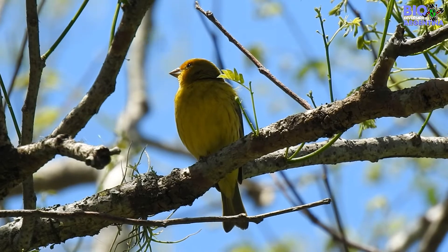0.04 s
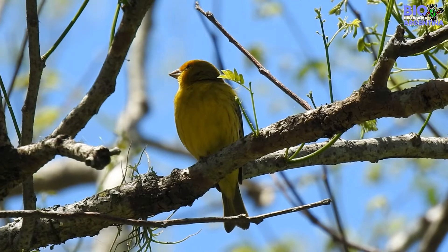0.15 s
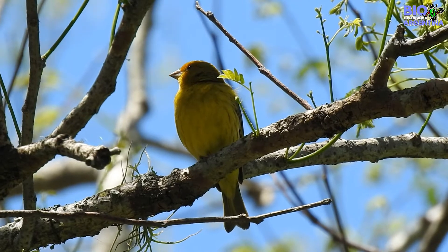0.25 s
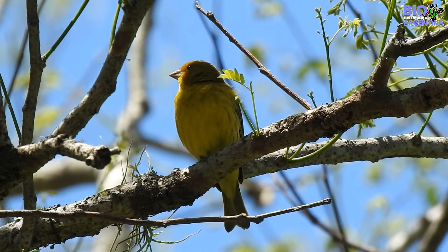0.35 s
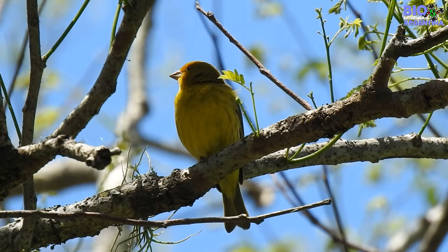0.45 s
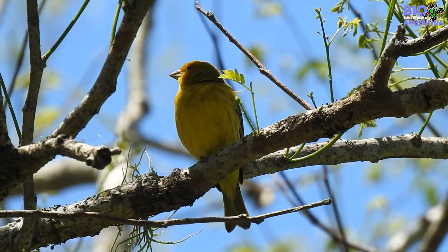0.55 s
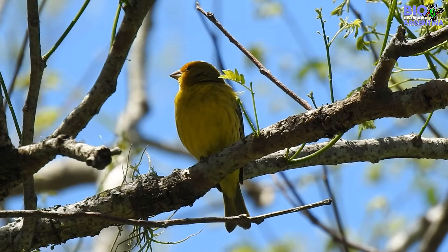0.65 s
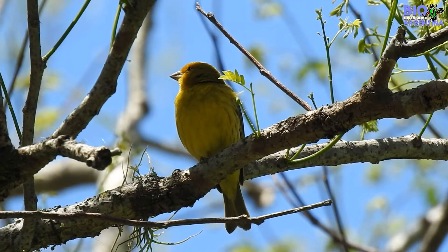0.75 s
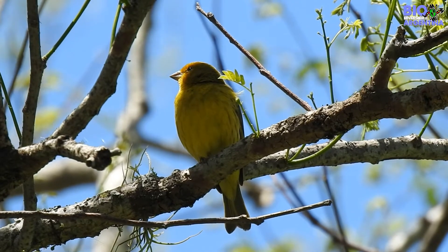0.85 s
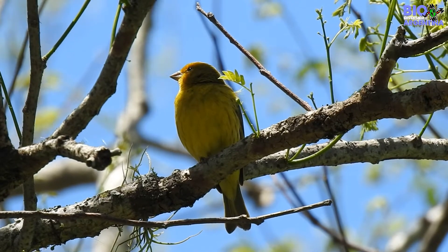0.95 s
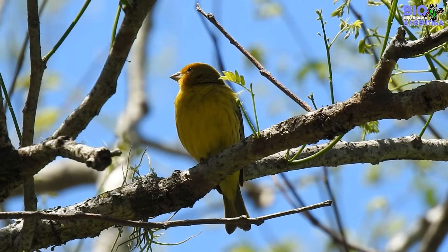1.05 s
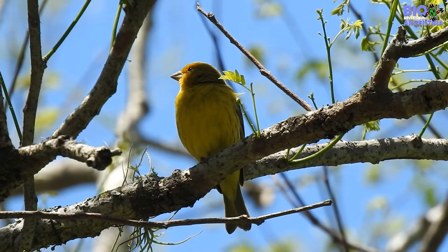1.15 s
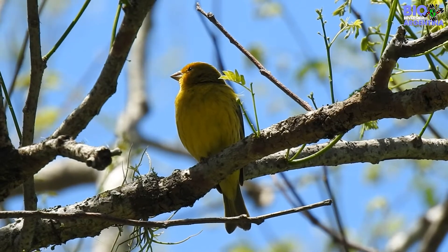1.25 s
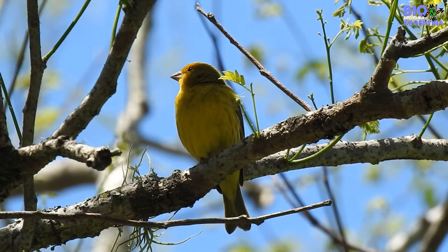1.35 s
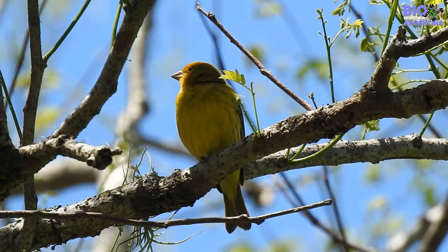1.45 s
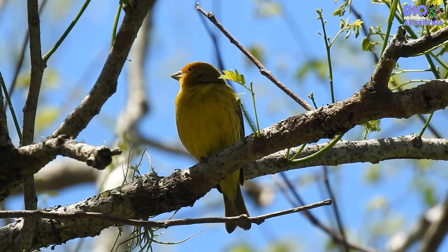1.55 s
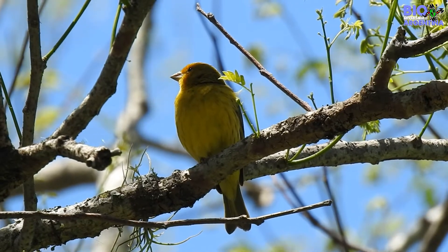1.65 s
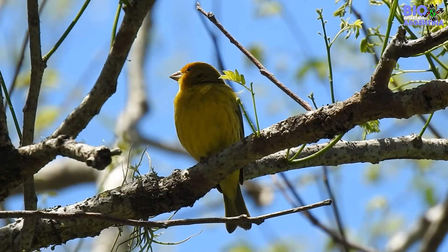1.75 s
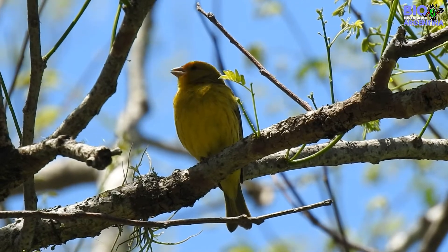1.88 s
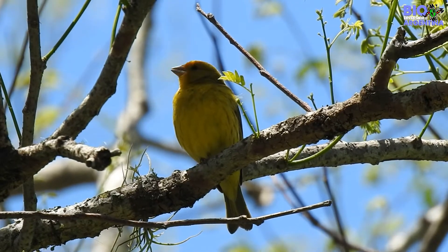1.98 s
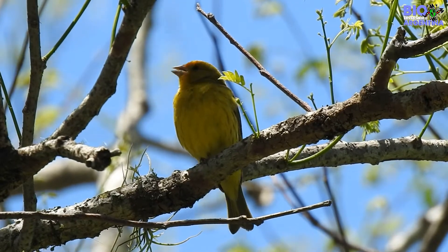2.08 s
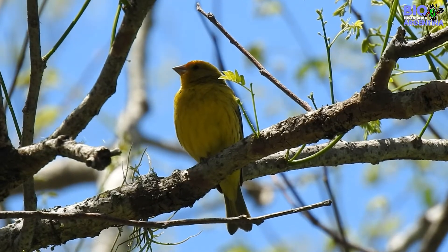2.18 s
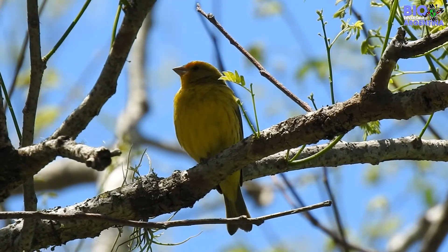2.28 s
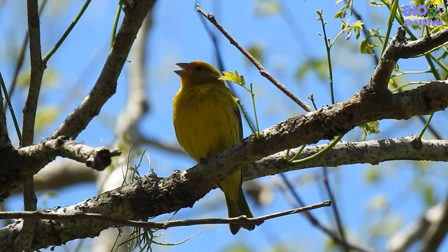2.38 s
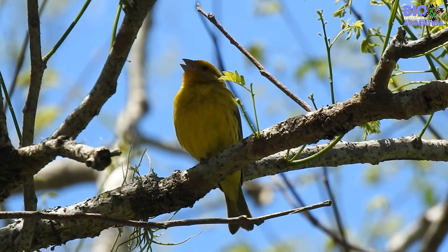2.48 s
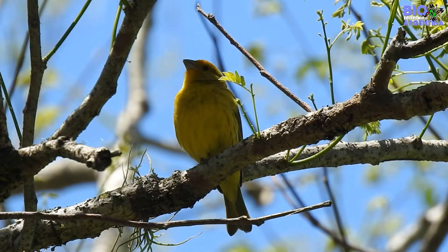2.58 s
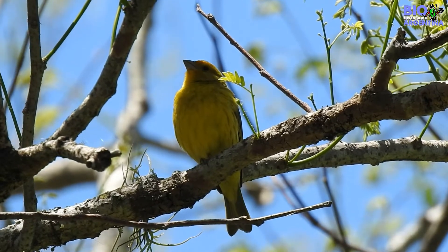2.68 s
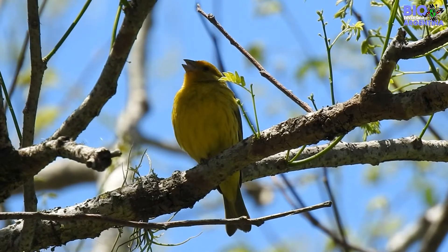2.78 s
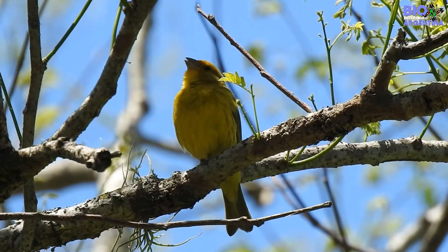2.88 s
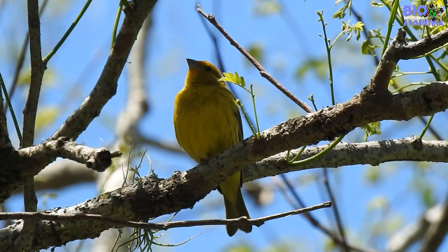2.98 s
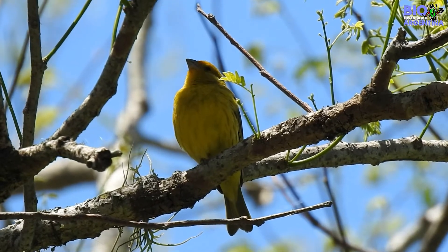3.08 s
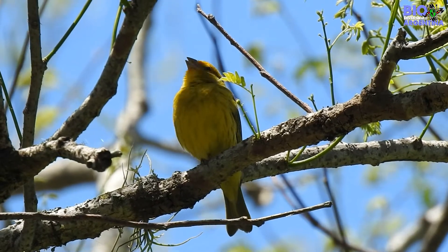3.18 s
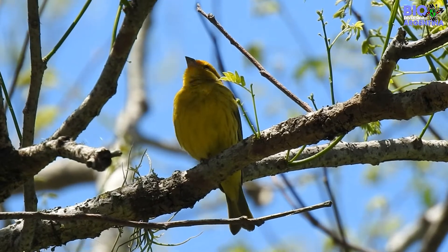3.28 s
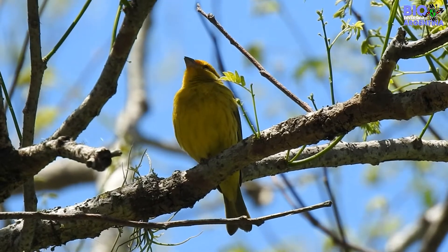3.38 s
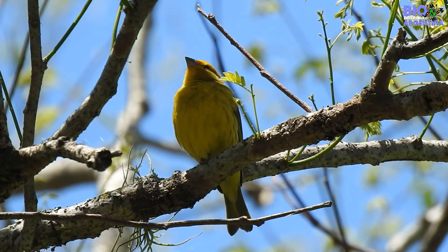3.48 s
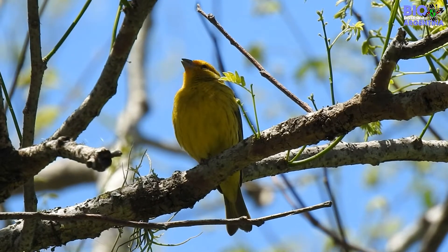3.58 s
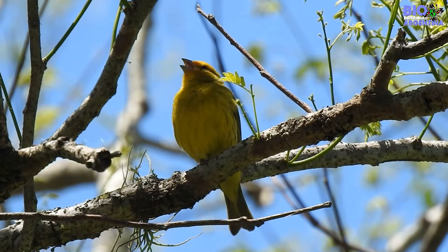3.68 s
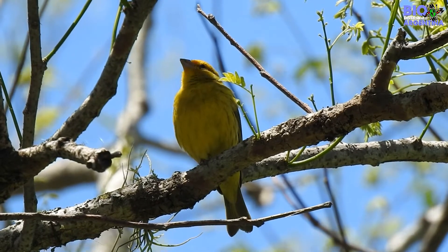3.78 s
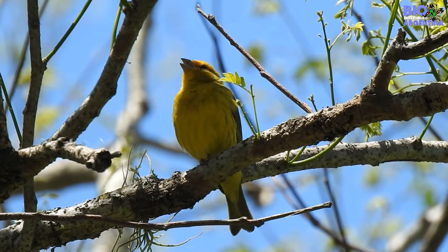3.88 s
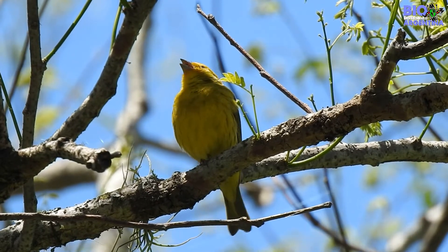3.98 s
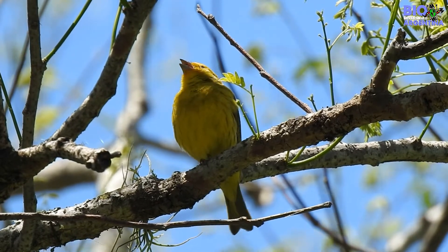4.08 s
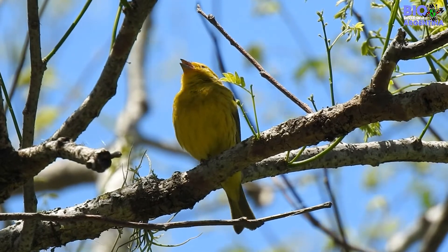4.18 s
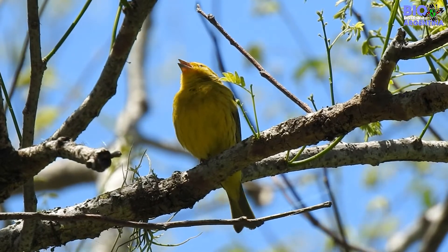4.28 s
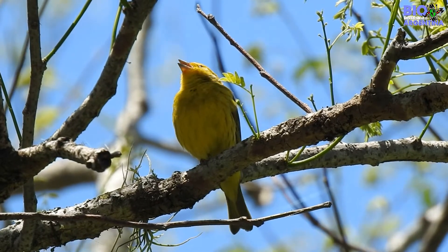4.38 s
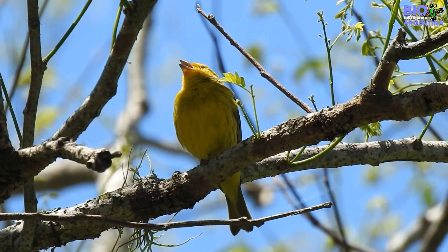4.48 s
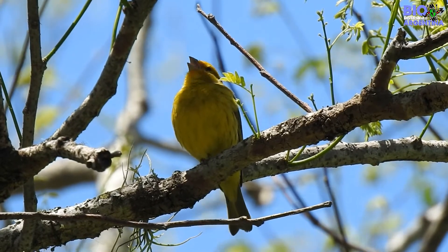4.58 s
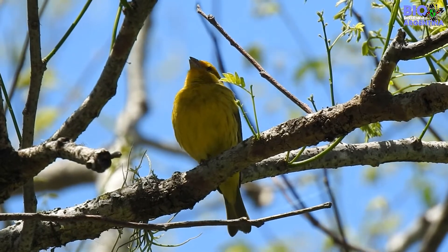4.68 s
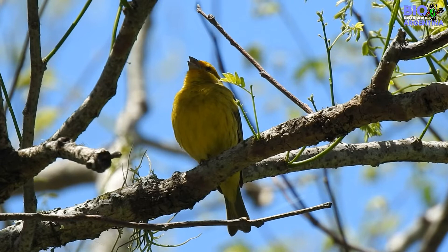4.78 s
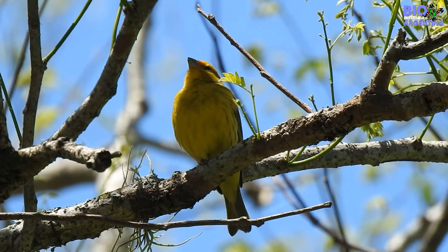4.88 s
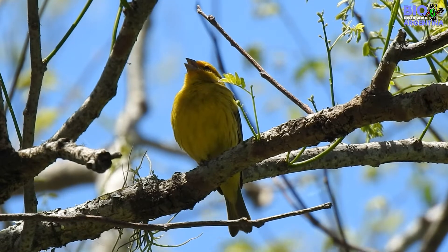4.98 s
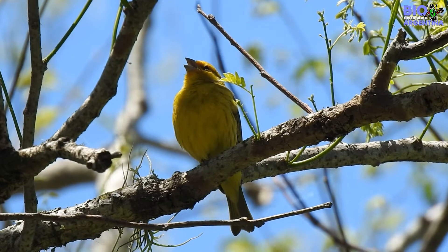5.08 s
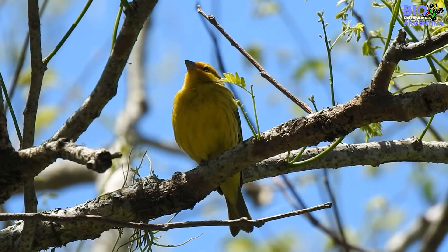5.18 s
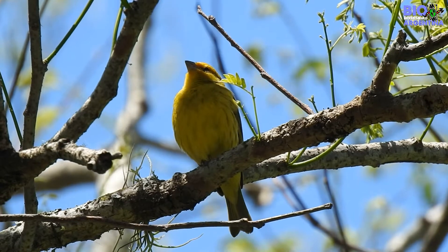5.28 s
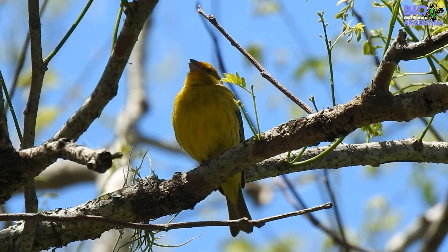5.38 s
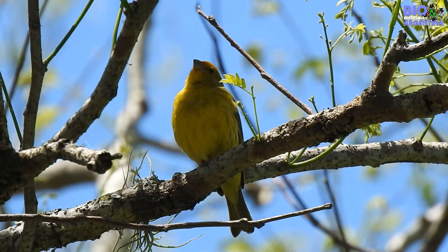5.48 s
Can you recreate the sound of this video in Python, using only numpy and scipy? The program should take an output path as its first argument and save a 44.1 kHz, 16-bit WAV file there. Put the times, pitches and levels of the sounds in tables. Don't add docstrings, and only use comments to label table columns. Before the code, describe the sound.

A small bird whistles quick, piercing hooked chirps while other birds cheep and trill, over faint insect hiss, low hum and a distant revving engine.

```python
import sys
import numpy as np
from scipy import signal
from scipy.fft import rfft, irfft, next_fast_len
from scipy.io import wavfile
from scipy.ndimage import uniform_filter1d, map_coordinates

SR = 44100
rng = np.random.default_rng(int(sys.argv[2]) if len(sys.argv) > 2 else 0)


def makeup_ratio(level_db):
    decades = np.asarray(level_db, float) / 20
    return 10 ** decades


def bounce(signal):
    frames = np.transpose(np.atleast_2d(signal))
    limited = np.clip(frames, -1, 1)
    pcm = np.round(limited * 32767).astype(np.int16)
    wavfile.write(sys.argv[1], SR, pcm)


N = 244314

# pitch_hz, level_db
HUM = [(110, -47), (165, -56), (220, -56), (331, -68)]
# top_s, top_hz, fall_s, end_hz, level_db
COOS = [
    (2.62, 555, .4, 565, -55),
    (3.87, 750, .18, 740, -54),
    (4.3, 640, .35, 540, -51),
]
# rise_s, start_hz, sag of the fall (ratio)
COO_SHAPES = [(.17, 575, .1), (.14, 575, .1), (.17, 545, 3)]
# freq_hz, density_db (per Hz)
INSECTS = [(3500, -21.5), (5000, -12.5), (6000, -4), (7100, -3), (7600, -13), (8600, -22.5), (11000, -26.5)]
# time_s, level_db
INSECT_LEVEL = [(0, -49), (1, -49), (1.9, -50.5), (3.2, -44), (4.7, -46.5), (5.54, -53)]
# start_s, end_s
MOTOR_SPAN = (.97, 1.9)
# freq_hz, density_db (per Hz)
AIR = [(40, -25), (70, -7.5), (110, -11), (200, -4.5), (290, -23), (500, -24.5), (1000, -28.5),
       (2500, -30.5), (4600, -27.5), (9000, -41.5), (15600, -56)]
# freq_hz, likeness (ratio)
COHERENCE = [(40, .5), (70, 0.96), (200, 0.95), (300, 0.75), (1500, 0.64), (3000, 0.43), (7000, 0.37),
             (14000, 0.25)]
# time_s, firing_hz, level_db, rasp_db
ENGINE = [(0, 73.75, -47.5, -50), (.5, 82.3, -48, -48.5), (1.05, 75.6, -72, -53), (1.25, 74.95, -48.5, -51),
          (1.83, 93.1, -44, -47.5), (2.04, 80.36, -48, -54), (2.22, 72.86, -61, -52.5),
          (2.52, 87.76, -46, -50.5), (2.75, 122.5, -39.5, -43), (3.33, 91.9, -47, -46.5),
          (3.52, 72.23, -70, -53.5), (3.89, 112, -39.5, -45), (4.27, 102.4, -43, -44),
          (4.41, 113.4, -38, -42.5), (4.76, 77.53, -50.5, -49), (5.03, 77.7, -57, -53),
          (5.37, 113.5, -34.5, -44.5), (5.54, 108, -43, -46)]
# order (multiple of the firing rate), level_db
ORDERS = [(1, 1), (1.5, -1.5), (2, -9), (2.5, -32.5), (3, -22.5)]
# freq_hz, width_hz, level_db
EXHAUST = [(670, 94, 1.5), (1295, 199, 2), (1940, 730, -2.5), (3320, 1400, -9.5)]
# freq_hz, t60_s
LEAVES = [(2000, 0.092), (4500, 0.39), (6500, 0.36), (8500, 0.27), (11000, 0.2)]
# delay_s, level_db
BRANCHES = [(.0031, -10.5), (.0074, -3), (.0118, -9), (.017, -8.5), (.026, -9.5), (.037, -25)]
# start_s, low_hz, low_db, high_hz, high_db
CHEEPS = [(0.441, 5240, -46.5, 7450, -32), (0.572, 4910, -42, 7070, -27), (0.697, 4770, -39.5, 6930, -25.5),
          (0.828, 4670, -38, 6880, -27), (1.883, 4850, -42.5, 7322, -25), (2, 4650, -42, 6980, -23.5),
          (2.113, 4750, -38, 6775, -25), (2.238, 4730, -38, 6796, -25), (2.371, 4690, -37, 6830, -24),
          (2.485, 4780, -38.5, 6760, -25), (2.631, 4680, -38, 6700, -28), (3.686, 4690, -40.5, 7030, -27),
          (3.81, 4860, -38.5, 6560, -26), (3.936, 4340, -34, 6150, -30), (4.077, 4520, -39, 6750, -25),
          (4.211, 4520, -40.5, 6620, -26.5), (4.34, 4520, -37.5, 6270, -31.5),
          (4.473, 4460, -40.5, 6490, -25)]
CHEEP_LENGTHS = [.048, 0.064, .035, .033, 0.042, 0.046, .04, .036, 0.037, 0.039, 0.044, 0.042, 0.062, 0.016,
                 0.044, .035, .035, 0.023]
# time_s, pitch_hz, level_db
WHISTLE = [
    (0.5, 5310, -57),
    (.55, 5770, -43),
    (0.621, 6410, -28.5),
    (.7, 7470, -34),
    (0.739, 7500, -27.5),
]
# start_s, length_s, start_hz, end_hz, level_db
FAR_CALLS = [(0.063, 0.052, 3050, 3060, -55), (.22, 0.02, 3150, 3100, -57), (0.298, 0.027, 3160, 3120, -58),
             (.455, 0.038, 3150, 3150, -56.5), (.665, 0.027, 3160, 3160, -54.5),
             (0.897, 0.029, 3155, 3165, -51), (1.031, 0.042, 3130, 3146, -57),
             (1.147, 0.051, 3150, 3070, -61), (1.287, 0.045, 3100, 3100, -74),
             (1.053, 0.17, 4490, 4656, -57), (1.174, 0.077, 4650, 4650, -67),
             (1.318, 0.069, 4190, 4060, -60), (1.641, 0.03, 4005, 4050, -55),
             (1.74, 0.059, 3850, 3849, -61), (1.79, 0.011, 7600, 6500, -50),
             (2.345, 0.043, 3850, 3730, -56.5), (2.672, 0.015, 3730, 3560, -54)]
# top_s, top_hz, fall_s, end_hz, level_db
SLURS = [
    (2.728, 2870, 0.041, 1625, -45.5),
    (3.225, 4450, .035, 3310, -41),
    (3.32, 2280, 0.065, 1190, -31),
    (3.54, 4850, 0.0069, 3610, -34),
    (3.571, 6200, 0.016, 5170, -42),
    (4.699, 5230, 0.073, 3127, -28.5),
    (4.768, 3100, 0.013, 2220, -26),
]
# rise_s, start_hz, sag of the fall (ratio)
SLUR_SHAPES = [(.001, 2400, 0.94), (.001, 4530, 1.3), (.001, 2380, 2.8), (.01, 4950, 2.6),
               (.01, 4180, 0.67), (.01, 5060, 0.99), (.001, 3440, 1.6)]
# time_s, pitch_hz
LONG_SLURS = [
    [(3.588, 5230), (3.625, 4410), (3.66, 4080), (3.695, 3430), (3.73, 2760), (3.76, 2584)],
    [(4.855, 2007), (4.863, 2520), (4.925, 2970), (4.955, 2930), (4.972, 2544), (4.99, 2113), (5.005, 1950),
     (5.018, 1476)],
]
LONG_SLUR_LEVELS = [-39, -35.5]
SLUR_BRIGHTNESS = [5, 0, 1, -1, -0.5, -3, 0.5, -0.5, 1]
# start_s, start_hz, level_db
TRILL = [(3.995, 5610, -20), (4.035, 5730, -18.5), (4.079, 5680, -18.5), (4.124, 5720, -18),
         (4.173, 5660, -19), (4.222, 5710, -18.5), (4.267, 5780, -19), (4.314, 5650, -18),
         (4.362, 5710, -19), (4.407, 5650, -20.5), (4.454, 5570, -21), (4.497, 5400, -19),
         (4.548, 5750, -20), (4.598, 5760, -23.5)]
TRILL_STRETCH = [1.0, 1.04, 1.02, 1.0, .95, .98, .98, .96, .96, .94, .92, .97, .98, .92]
# time_s, pitch (ratio), level_db
TRILL_SHAPE = [(-.001, 1, -13), (.003, 0.95, -4), (.009, .92, -5), (0.015, .85, -1.5), (.019, 0.74, -9.5),
               (.024, .61, -17.5)]
# freq_hz, gain_db
BEAK = [(1500, -43), (3000, -11), (4500, -7.5), (6000, 11), (7500, 4.5), (8300, -2.5), (9500, -20.5),
        (11000, -29.5), (14000, -40.5)]
# top_s, top_hz, fall_s, end_hz, level_db
HOOKS = [(1.956, 9780, 0.0081, 8220, -18), (2.166, 10130, 0.0097, 8830, -16),
         (2.205, 10460, 0.015, 9360, -14.5), (2.527, 8820, 0.0042, 8100, -11.5),
         (2.588, 8800, 0.0034, 8680, -9.5), (2.932, 7640, 0.029, 4890, -7.5),
         (3.003, 7160, 0.07, 3430, -10.5), (3.304, 8650, 0.028, 5550, -10), (3.383, 6545, 0.038, 3400, -6),
         (3.476, 8450, .019, 5430, -9), (3.757, 8420, 0.031, 5560, -10), (3.853, 8650, .031, 5355, -11),
         (5.488, 7780, .048, 5460, -15.5), (2.539, 8490, .019, 5620, -8.5),
         (2.603, 9100, .015, 5650, -14.5), (2.674, 8706, .011, 5900, -14.5)]
# rise_s, start_hz, sag of the fall (ratio)
HOOK_SHAPES = [(0.015, 9240, -5.5), (0.016, 8800, 0), (0.0036, 10480, -0.3), (0.0099, 6960, -1),
               (0.01, 5700, 0.5), (0.00087, 7860, 1.2), (0.015, 6100, 0.4), (0.0079, 6700, 1.4),
               (0.0097, 4600, -1), (.0095, 7500, 0.6), (.012, 6300, 1.3), (.01, 8100, 0.4),
               (0.0017, 6000, 4), (.004, 8200, -0.3), (.002, 8800, -0.4), (0.0045, 8500, -0.3)]
HOOK_RISE_SAG = [2.8, 3.5, 1.5, 1.5, 1.8, 2.8, 2.8, 1.1, 3.2, 2.8, 1.6, 2.8, 2.8, 1.5, 1.5, 1.5]
# start_s, length_s, start_hz, end_hz, level_db
FLICKS = [
    (1.994, 0.0066, 9830, 9820, -8.5),
    (2.001, .017, 9840, 5480, -11.5),
    (2.644, 0.012, 7630, 8670, -16),
    (3.822, .027, 6240, 8470, -11),
    (3.492, 0.02, 5000, 3500, -18.5),
    (2.214, .013, 9800, 6300, -13.5),
    (5.476, 0.0087, 7280, 7520, -14.5),
]
# freq_hz, gain_db
THROAT = [(3500, -27), (4700, -18.5), (5600, -11), (6300, -2.5), (7200, 0), (8500, -4.5), (9800, -12),
          (10500, -15.5)]


def unit(x):
    return x / np.sqrt(np.mean(x ** 2) + 1e-20)


def along(points, hz):
    f, v = np.transpose(points)
    return np.interp(np.log(hz + 1), np.log(f + 1), v)


def curves(rows):
    s, *cols = np.transpose(rows)
    return [np.interp(np.arange(N) / SR, s, c) for c in cols]


def wobble(rate, size=N):
    step = 1 + size // 20000
    coarse = np.arange(0, size + step, step)
    knots = rng.standard_normal(int(size * 2000 / SR) + 4 if step == 1 else 400)
    return np.interp(np.arange(size), coarse, map_coordinates(knots, [coarse * rate / SR]))


def filtered(x, response):
    m = next_fast_len(N + SR // 2)
    return irfft(rfft(x, m) * response(np.fft.rfftfreq(m, 1 / SR)), m)[..., :N]


def rush(spectrum, patchy_db):
    z = signal.stft(rng.standard_normal((2, N)), nperseg=512)[2]
    field = uniform_filter1d(uniform_filter1d(rng.standard_normal(z.shape[1:]), 6, 0), 14, 1)
    pair = signal.istft(z * makeup_ratio(patchy_db * unit(field)), nperseg=512)[1][:, :N]

    def mid_side(hz):
        turn = np.arccos(np.clip(along(COHERENCE, hz), -1, 1)) / 2
        return makeup_ratio(along(spectrum, hz)) * [np.cos(turn), np.sin(turn)]

    mid, side = filtered(pair, mid_side)
    return unit(np.array([mid + side, mid - side]))


def glide(start_hz, end_hz, sag):
    u = np.arange(13) / 12
    sag = sag + 1e-4
    return u, start_hz + (end_hz - start_hz) * np.expm1(-sag * u) / np.expm1(-sag)


def hook(note, shape, rise_sag):
    top, top_hz, fall, end_hz, _ = note
    rise, start_hz, sag = shape
    u, up = glide(start_hz, top_hz, rise_sag)
    _, down = glide(top_hz, end_hz, sag)
    return np.r_[top - abs(rise) * (1 - u), top + fall * u[1:]], np.r_[up, down[1:]]


def breathed(s, hz, db, attack_s, attack_db, release_s, release_db):
    attack = attack_db * np.clip(1 - (s - s[0]) / attack_s, 0, 1)
    release = release_db * np.clip(1 - (s[-1] - s) / release_s, 0, 1)
    return np.transpose([s, hz, db + attack + release])


def add_note(out, rows, overtones=((1, 0),), beak=False, fade=0.0016, round_s=0.0032, rough=0., rate=300):
    s, hz, db = np.transpose(rows)
    t = np.arange(round(s[0] * SR), min(round((s[-1] + fade) * SR), N)) / SR
    pitch = uniform_filter1d(np.interp(t, s, hz), max(int(round_s * SR), 1), mode="nearest")
    edges = np.clip(np.minimum(t - s[0], s[-1] + fade - t) / fade, 0, 1)
    flutter = 1 + rough * wobble(rate, size=len(t))
    turns = 2 * np.pi * (np.cumsum(pitch) / SR + rng.random())
    tone = sum(makeup_ratio(level + beak * along(BEAK, k * pitch)) * np.sin(k * turns) for k, level in overtones)
    out[round(s[0] * SR):][:len(t)] += makeup_ratio(np.interp(t, s, db)) * edges * flutter * tone


def leaves(x, wet_db, echo_db, lag, lean_db, piece=8192):
    out = np.zeros((2, N + SR))
    for i in range(0, N, piece):
        if np.any(x[i:i + piece]):
            hz, t, z = signal.stft(rng.standard_normal((2, 24000)), SR, nperseg=256)
            decay = makeup_ratio(-60 * t / along(LEAVES, hz)[:, None]) + makeup_ratio(-26.5 - 60 * t / 1.5)
            ahead, aside = signal.istft(z * decay, SR, nperseg=256)[1]
            tail = np.array([ahead + 1.01 * aside, ahead - 0.83 * aside])
            wet = signal.fftconvolve(x[None, i:i + piece], tail / np.linalg.norm(tail[0]), axes=1)
            out[:, i + 150:i + 150 + wet.shape[1]] += makeup_ratio(wet_db) * wet
    for k, (s, db) in enumerate(BRANCHES):
        out[0, round(s * SR) + k % 2:][:N] += makeup_ratio(db + echo_db) * x
        out[1, round(s * SR) + 1 - k % 2:][:N] += makeup_ratio(db + echo_db) * x
    sides = np.array([[1], [-1]])

    def direct(hz):
        delay = np.exp(1j * np.pi * hz * lag / SR * sides)
        return delay * makeup_ratio(sides * lean_db / 2 * (hz / 7000) ** 2)

    return filtered(x, direct) + out[:, :N]


def distant_air():
    return makeup_ratio(-47.5 + 1.0 * wobble(4.1)) * rush(AIR, patchy_db=2.5)


def small_motor():
    t = np.arange(N) / SR
    start, end = MOTOR_SPAN
    return makeup_ratio(-75.5 + 1.5 * wobble(22.97)) * np.sin(2 * np.pi * 11020 * t) * (t > start) * (t < end)


def insects():
    return makeup_ratio(curves(INSECT_LEVEL)[0] - 0.5) * rush(INSECTS, patchy_db=2.1)


def machine_hum():
    t = np.arange(N) / SR
    return sum(makeup_ratio(db - 2.0 + 4.5 * wobble(9.6)) * np.sin(2 * np.pi * hz * t + 0.8 * wobble(4.9))
               for hz, db in HUM)


def dove():
    x = np.zeros(N)
    for coo, shape in zip(COOS, COO_SHAPES):
        path = hook(coo, shape, rise_sag=0.25)
        rows = breathed(*path, coo[-1], attack_s=0.1, attack_db=-1.5, release_s=0.28, release_db=-5.0)
        add_note(x, rows, [(0.98, 3.3)], fade=0.029, round_s=0.062, rough=0.5, rate=42.5)
    return x


def engine():
    rate, db, rasp_db = curves(ENGINE)
    cycles = np.cumsum(rate * (1 + 0.01243 * wobble(30))) / SR
    orders = sum(makeup_ratio(db + 0.5 + level + 3.57 * wobble(9.8)) * np.sin(2 * np.pi * k * cycles + .5 * wobble(17))
                 for k, level in ORDERS)
    uneven = 1 + 0.05 * np.cos(np.pi * np.floor(cycles))
    firing = np.diff(np.floor(cycles), prepend=0) * uneven
    hz, t, z = signal.stft(rng.standard_normal((2, N)) + 0.34 * unit(firing), SR, nperseg=2048)
    fading = uniform_filter1d(uniform_filter1d(rng.standard_normal(z.shape[1:]), 3, 0), 6, 1)
    puffs = signal.istft(z * makeup_ratio(4.45 * unit(fading)), SR, nperseg=2048)[1][:, :N]

    def pipe(f):
        modes = sum((-1) ** k * makeup_ratio(level) * 1j * f * w / (c * c - f * f + 1j * f * w)
                    for k, (c, w, level) in enumerate(EXHAUST))
        return modes / (1 + (f / 6500) ** 6)

    left, right = filtered(puffs, pipe)
    rasp = unit(left + 0.18 * np.array([right, -right]))
    return orders + makeup_ratio(rasp_db + 0.64 * wobble(12)) * rasp


def neighbour():
    x, t = np.zeros(N), np.array([0, .1, .2, .33, .55, .8, 1])
    scoop = 1.03 - .29 * np.exp(-t / .23) - .06 * t ** 3
    low_swell_db = np.array([-5.5, -7.5, 1.5, 3.5, 2.5, 0.5, -14])
    high_swell_db = np.array([-20.0, -11.0, -1.5, 2.0, 1.0, 2.5, 0.5])
    for (s, low_hz, low_db, high_hz, high_db), length in zip(CHEEPS, CHEEP_LENGTHS):
        low = np.transpose([s + t * length, low_hz * scoop, low_db + low_swell_db])
        high = np.transpose([s + t * length, high_hz * scoop, high_db + high_swell_db])
        add_note(x, low, [(1, -2.5), (2, -10)], rough=0.42, rate=270)
        add_note(x, high, round_s=.004, rough=.8, rate=450)
    add_note(x, WHISTLE, fade=.02, round_s=.03, rough=.35)
    for s, length, start_hz, end_hz, db in FAR_CALLS:
        rate = 120 if start_hz < 4300 else 600
        add_note(x, [(s, start_hz, db), (s + length, end_hz, db)], fade=.008, rough=.8, rate=rate)
    return leaves(x, wet_db=-4, echo_db=-1, lag=0.67, lean_db=1.0)


def slurring_bird():
    x, fine = np.zeros(N), np.arange(25) / 24
    notes = [(*hook(note, shape, rise_sag=2.5), note[-1]) for note, shape in zip(SLURS, SLUR_SHAPES)]
    for path, db in zip(LONG_SLURS, LONG_SLUR_LEVELS):
        s, hz = np.transpose(path)
        steps = s[0] + fine * (s[-1] - s[0])
        notes.append((steps, np.interp(steps, s, hz), db))
    for note, bright_db in zip(notes, SLUR_BRIGHTNESS):
        rows = breathed(*note, attack_s=0.014, attack_db=-15, release_s=0.014, release_db=-6.5)
        overtones = [(1, 4.5), (2, -1.0 + bright_db), (3, -7.5 + 2 * bright_db), (4, -11.5 + 3 * bright_db)]
        add_note(x, rows, overtones, beak=True, round_s=0.009, rough=0.15)
    for (s, hz, db), stretch in zip(TRILL, TRILL_STRETCH):
        rows = [(s + t * stretch, hz * ratio, db + level) for t, ratio, level in TRILL_SHAPE]
        add_note(x, rows, [(1, 0.5), (2, -2.0)], beak=True, round_s=0.0012, rough=0.22)
    return leaves(x, wet_db=-12.0, echo_db=-7.5, lag=0.16, lean_db=2.0)


def warble():
    start_s, top_s, end_s, turn_s = 5.123, 5.157, 5.25, 0.034
    start_hz, mid_hz, swing_hz, ripple_hz = 5480, 6373, 731, 143
    s = np.arange(start_s, end_s, .002)
    turns = 2 * np.pi * (s - top_s) / turn_s
    climb = np.interp(s, [start_s, top_s], [start_hz, mid_hz + swing_hz])
    climb = climb + ripple_hz * (np.cos(2 * turns) - 1)
    tiring = np.interp(s, [end_s - turn_s, end_s], [1, 0.29])
    swing = mid_hz + swing_hz * tiring * np.cos(turns)
    return s, np.where(turns < 0, climb, swing)


def finch():
    x, notes = np.zeros(N), []
    sharp, swelling = (0.0061, -8), (0.0083, -10.5)  # attack_s, attack_db
    for note, shape, rise_sag in zip(HOOKS, HOOK_SHAPES, HOOK_RISE_SAG):
        notes.append((*hook(note, shape, rise_sag), note[-1], *sharp))
    for s, length, start_hz, end_hz, db in FLICKS:
        u, hz = glide(start_hz, end_hz, sag=1.0)
        attack = swelling if end_hz > start_hz + 500 else sharp
        notes.append((s + u * length, hz, db, *attack))
    notes.append((*warble(), -14.5, *swelling))
    for s, hz, db, attack_s, attack_db in notes:
        rows = breathed(s, hz, db + along(THROAT, hz), attack_s, attack_db, release_s=0.0072, release_db=-7.5)
        add_note(x, rows, [(1, 3), (2, -49)], fade=.0012, round_s=0.0033, rough=0.15)
    return leaves(x, wet_db=-7.5, echo_db=-8.0, lag=0.24, lean_db=1.5)


def scene():
    background = distant_air() + small_motor() + insects() + machine_hum() + dove()
    return background + engine() + neighbour() + slurring_bird() + finch()


def top_cut(x):
    return signal.sosfilt(signal.butter(12, 15700, fs=SR, output="sos"), x)


def record(dry):
    bent = dry + 0.018 * dry ** 2
    passed = filtered(bent, lambda hz: (hz < 15750) & (hz > 15))
    hz, t, z = signal.stft(passed, SR, nperseg=1024)
    bands = np.abs(z[:, :512]).reshape(2, 64, 8, -1).max(axis=2).mean(axis=0)
    holds = .82
    masker = signal.lfilter([1 - holds], [1, -holds], bands[8:].max(axis=0))
    jitter_db = 5.5 * uniform_filter1d(rng.standard_normal(bands.shape), size=5, axis=1)
    mask_db = -54.5 + 16 * np.log10(masker + 1e-9) + jitter_db
    masked = (bands < makeup_ratio(mask_db)) & (hz[:512:8, None] > 7400)
    z[:, :512] *= 1 - np.repeat(masked, 8, axis=0)
    mix = signal.istft(z, SR, nperseg=1024)[1][:, :N]
    return top_cut(mix)


dry = scene()
out = record(dry)
bounce(out)
```